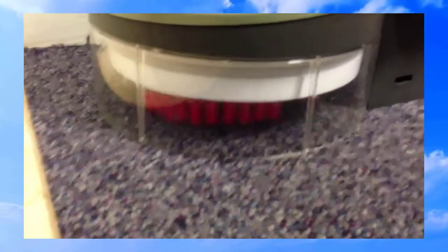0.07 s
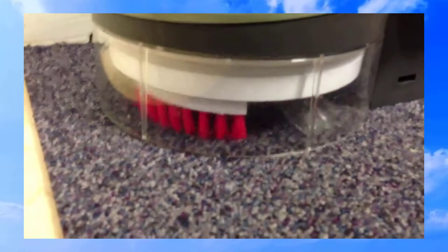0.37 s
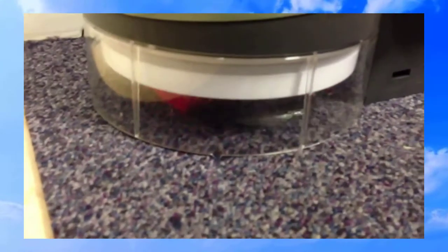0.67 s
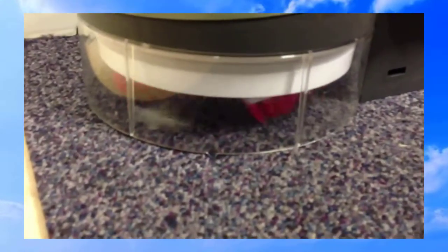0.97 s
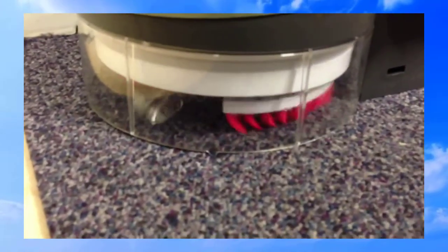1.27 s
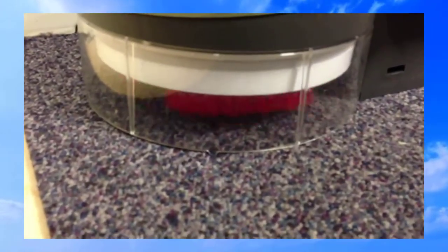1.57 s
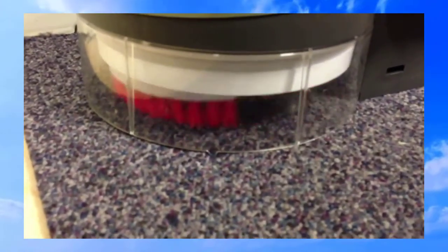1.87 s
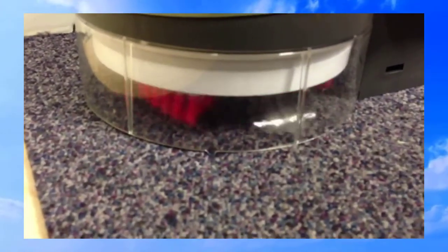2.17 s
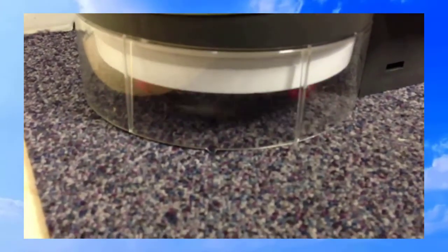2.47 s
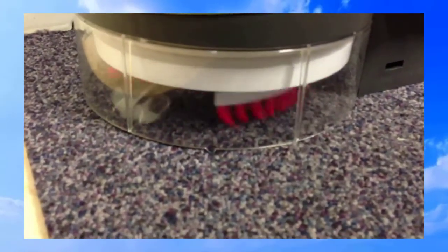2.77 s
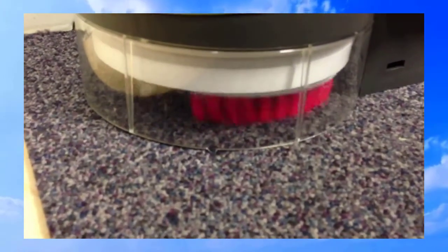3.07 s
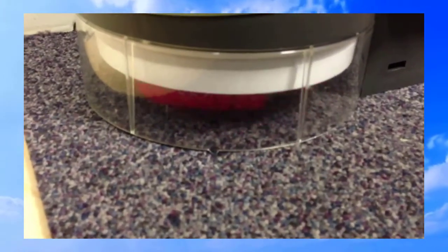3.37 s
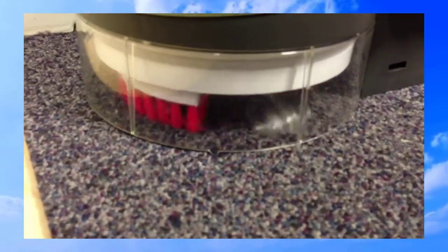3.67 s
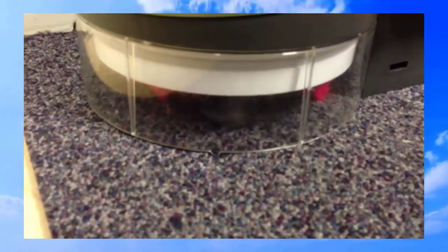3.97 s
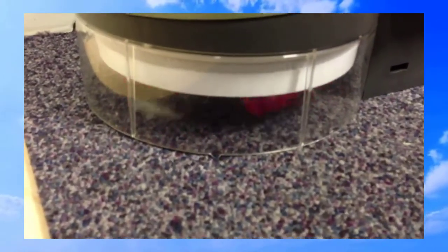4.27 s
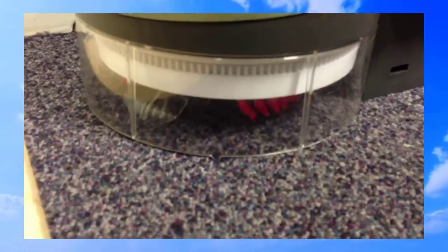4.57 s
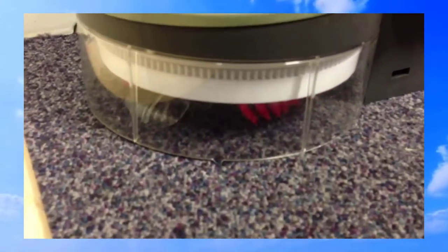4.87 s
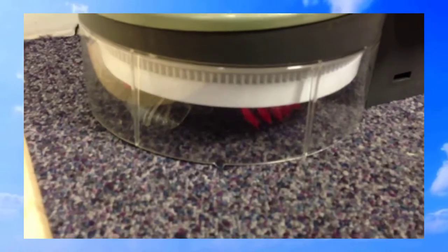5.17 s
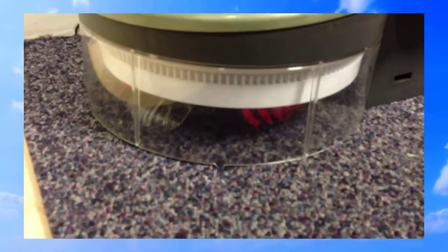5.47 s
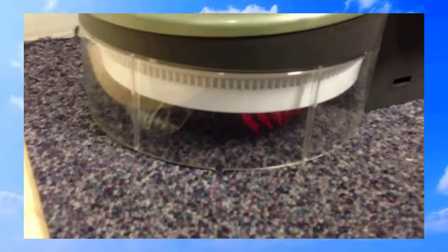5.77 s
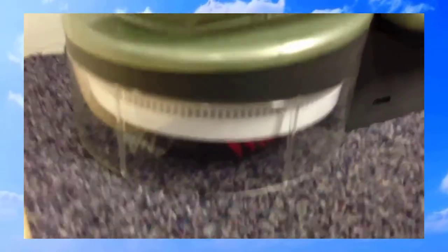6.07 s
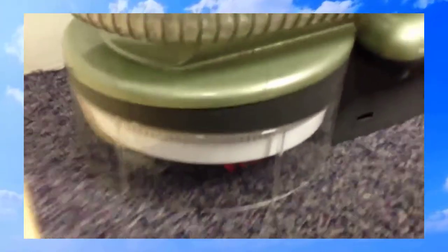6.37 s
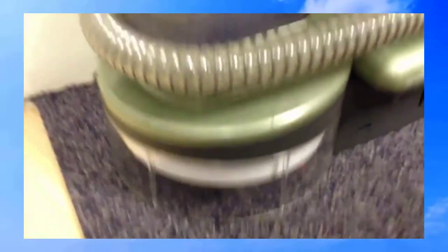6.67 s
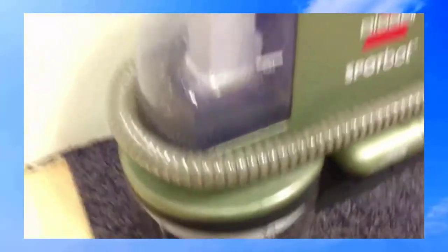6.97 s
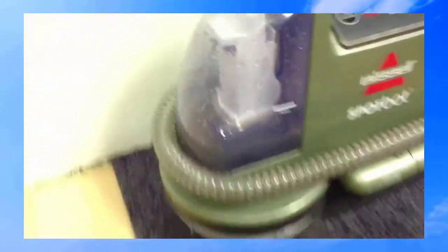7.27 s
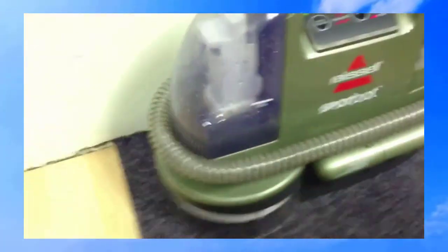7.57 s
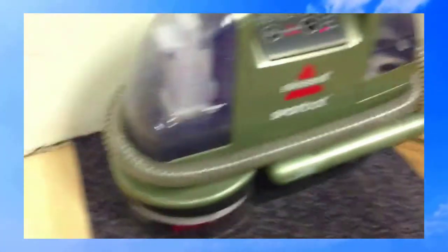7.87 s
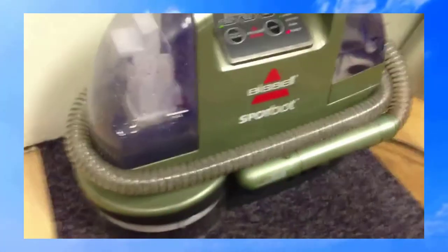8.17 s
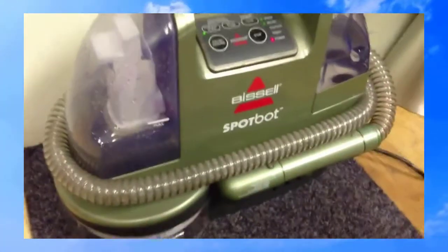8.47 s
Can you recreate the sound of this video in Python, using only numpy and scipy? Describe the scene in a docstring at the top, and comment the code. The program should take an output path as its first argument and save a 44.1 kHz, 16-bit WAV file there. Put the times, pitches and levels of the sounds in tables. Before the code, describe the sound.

A portable carpet cleaner runs close by in a small room, its motor giving a steady hum and high whine over rushing air. The whine swells and dips as the brush head circles, with faint scrubbing and a few light plastic knocks. The brushes rest about halfway through. Then the machine switches off, its tones gliding down while the rush fades to a soft whirr and hiss.

```python
"""A small room, with a portable carpet cleaner running on the floor. Its suction motor sings in tones locked
to one shaft, over the rush of air in the housing; the brush head circles and scrubs, then rests, and
plastic knocks now and then. The cleaner is switched off: the tones glide down as the rotor coasts,
ringing the shell on their way, and the rush fades to a hiss over the low rumble of the room."""
import sys
import numpy as np
from scipy import signal
from scipy.fft import rfft, irfft, next_fast_len
from scipy.io import wavfile

SR = 44100
rng = np.random.default_rng(int(sys.argv[2]) if len(sys.argv) > 2 else 0)


def generate_wav(signal):
    """Clip the signal to [-1, 1] and save it as 16-bit WAV at the path in sys.argv[1]."""
    frames = np.transpose(np.atleast_2d(signal))
    scaled = np.clip(frames, -1, 1) * 32767
    pcm = np.round(scaled).astype(np.int16)
    wavfile.write(sys.argv[1], SR, pcm)


N = 384097
TIME = np.arange(N) / SR
BRUSH_STOP_S, SWITCH_OFF_S = 4.5, 6.46

# rotor speed under power: time_s, speed_hz
ROTOR_SPEED = [(0, 458.4), (1.3, 458.2), (2.7, 459.3), (4.05, 458.8), (5.3, 457.9), (6.46, 458.2)]
FULL_SPEED_HZ = ROTOR_SPEED[-1][1]


def from_db(db):
    """Decibels to gain."""
    return np.exp(np.log(10) / 20 * np.asarray(db))


def rms_one(x):
    """Scale to unit power."""
    return x / np.sqrt(np.mean(x ** 2) + 1e-20)


def curve(points):
    """An automation curve: straight lines between timed points."""
    return np.interp(TIME, *np.transpose(points))


def bumps(rows, at):
    """Decibels added by short smooth swells and dips."""
    return sum(db * np.exp(-((at - s) / half_length) ** 2) for s, half_length, db in rows)


def lift(resonances, hz):
    """Decibels that a set of peaks and dips adds at a frequency."""
    return sum(db / (1 + (2 * (hz - centre) / width) ** 2) for centre, width, db in resonances)


def drift(rate_hz):
    """A smooth random wobble of unit power."""
    r = np.exp(-40 * np.pi * rate_hz / SR)
    slow = signal.lfilter([1], [1, -2 * r, r * r], rng.standard_normal(N // 20 + 2002))[2000:]
    return np.interp(np.arange(N) / 20, np.arange(len(slow)), rms_one(slow))


def noise(spectrum, resonances=(), ripple_db=0):
    """Coloured noise of unit power, shaped by resonances and rippled by wall reflections."""
    size = next_fast_len(N)
    hz = np.maximum(np.fft.rfftfreq(size, 1 / SR), 1)
    points_hz, points_db = np.transpose(spectrum)
    colour_db = np.interp(np.log(hz), np.log(points_hz), points_db) + lift(resonances, hz)
    ripple_hz = np.arange(0, SR / 2, 20)
    colour_db += ripple_db * np.interp(hz, ripple_hz, rng.standard_normal(len(ripple_hz)))
    return rms_one(irfft(rfft(rng.standard_normal(size)) * from_db(colour_db), size)[:N])


def tone(phase, rough, flutter_hz):
    """A sine of unit power whose level and phase are shaken by turbulence."""
    shaken = (1 + rough * drift(flutter_hz)) * np.sin(phase)
    return rms_one(shaken + rough * drift(flutter_hz) * np.cos(phase))


def room_tone():
    """The bed: a low room rumble and a faint hiss that lingers around the machine."""
    # colours of the rumble and the hiss: freq_hz, level_db
    rumble = [(20, -67), (50, -57), (80, -45), (105, -20), (130, -14), (155, -1.5), (178, -8), (210, 7.5),
              (255, -3.5), (320, -9), (400, -11), (620, -6.5), (900, -8), (4000, -37)]
    hiss = [(60, -64), (180, -40), (310, -2), (440, -17), (620, -6.5), (720, -16), (900, -10.5),
            (1100, -12), (1600, -5.5), (1950, -11), (2500, -9.5), (3000, -16.5), (3900, -21), (4800, -19),
            (7900, -24), (8700, -25.5), (10100, -31), (15000, -41)]
    return from_db(-37) * noise(rumble) + from_db(-39.5) * noise(hiss, ripple_db=2)


def brush_turning():
    """One while the brush head circles, zero once it rests."""
    return np.clip((BRUSH_STOP_S - TIME) / 0.099, 0, 1)


def brush_swing(turn_s=1.635):
    """Level swing in dB as nozzles and brushes uncover and hide the air inlet, alike on every turn."""
    # passes over the inlet within one turn: centre_s, half_length_s, gain_db
    passes = [(.02, 0.034, 2), (0.29, 0.053, 3), (0.476, 0.12, 1.5), (0.773, 0.054, -5), (1.267, 0.21, 4),
              (1.415, 0.036, -8)]
    into_turn = np.linspace(0, turn_s, 400)
    return brush_turning() * np.interp(TIME % turn_s, into_turn, bumps(passes, into_turn))


def scrubbing():
    """Bristles dragged over the carpet shake the housing until the brush head rests."""
    # colour of the shaking: freq_hz, level_db
    colour = [(30, -45), (85, -45), (140, -2.5), (220, 9.5), (330, -3), (600, 1.5), (1500, -54)]
    return brush_turning() * from_db(-37.5 + 2 * drift(13)) * noise(colour)


def nozzles(speed_share):
    """Air whistles past the nozzles, a breathy band that swells and sinks as they circle."""
    # colour of the breath: freq_hz, level_db
    colour = [(1000, -39), (2550, -32), (2700, -3.5), (2800, 4), (2900, -9), (3030, -16), (3300, -2),
              (3450, 3), (3700, -28), (4000, -15), (4400, -20), (9000, -45)]
    return from_db(-34.8 + 1.2 * brush_swing()) * speed_share ** 5 * noise(colour)


def knocks(contact_s=0.0018):
    """A short plastic clatter swells to a soft blow, which rings the low modes of the housing."""
    # knocks of the brush head and housing: start_s, thump_db, clatter_db, length_s
    hits = [(0.449, -12, -37, 0.0105), (0.594, -16, -19.5, 0.0196), (2.275, -11, -22.5, 0.02),
            (3.945, -24, -20.5, 0.04), (6.483, -23, -28, 0.0177), (7.7, -19, -51, 0.0084)]
    # colour of the plastic clatter: freq_hz, level_db
    colour = [(80, -20), (170, -3), (300, -2), (700, -2), (1050, 2.5), (1600, -1), (2500, -20), (6000, -53),
              (15000, -60)]
    # low modes of the housing: pitch_hz, level_db, t60_s
    modes = [(150, -7, 0.059), (210, -4, 0.089), (260, -4, 0.064), (335, 1.5, 0.036), (590, -12, 0.032)]
    clatter, out, pushes = noise(colour), np.zeros(N), np.full(N, 1e-18)
    for start_s, thump_db, clatter_db, length_s in hits:
        age = np.clip((TIME - start_s) / length_s * 2, 0, 20)
        out += age * np.exp(1 - age) * from_db(clatter_db) * clatter
        push = np.exp(-((TIME - start_s - length_s / 2) / contact_s * 2) ** 2)
        pushes += from_db(thump_db) * push / push.sum()
    for k, (hz, db, t60_s) in enumerate(modes):
        r, w = np.exp(-np.log(1000) / (t60_s * SR)), 2 * np.pi * hz / SR
        ring = signal.lfilter([0, np.sin(w)], [1, -2 * r * np.cos(w), r * r], pushes)
        out += (-1) ** k * from_db(db) * ring
    # the knocks carry no deep bass
    return signal.sosfilt(signal.butter(2, 116, "high", fs=SR, output="sos"), out)


def side_tones():
    """Faint wavering tones sound until the power is cut."""
    # steady pitches of the running machine: pitch_hz, level_db
    pitches = [(559, -50), (2092, -51), (2371, -46)]
    running = np.exp(-np.maximum(TIME - SWITCH_OFF_S, 0) / 0.048)
    return running * sum(from_db(db) * tone(2 * np.pi * hz * TIME, rough=0.47, flutter_hz=3.7)
                         for hz, db in pitches)


def shell_rings(speed_hz, speed_share):
    """The slowing rotor shakes the shell, which flares as an overtone glides through a resonance."""
    # hollow rings of the shell: pitch_hz, width_hz, level_db, fade_exponent
    rings = [(621, 18, -29, 1.3), (1216, 55, -37, 5.4), (1440, 110, -20, 5.9), (2050, 70, -38, 2.4),
             (2960, 68, -34, 2.9), (3970, 86, -37, 3.6), (5620, 120, -41, 2.5), (6980, 140, -49, 2.2)]
    out, speeds = np.zeros(N), np.arange(speed_hz.max())
    for hz, width_hz, db, fade in rings:
        r = np.exp(-np.pi * width_hz / SR)
        poles = [1, -2 * r * np.cos(2 * np.pi * hz / SR), r * r]
        ring = rms_one(signal.lfilter([1, 0, -1], poles, rng.standard_normal(N)))
        meeting = sum(1 / (1 + ((k * speeds - hz) / width_hz) ** 4) for k in range(2, 25))
        out += from_db(db) * speed_share ** fade * np.interp(speed_hz, speeds, meeting) * ring
    return out * (1 - speed_share ** 10)


def suction_duct(speed_share):
    """The duct adds a hollow band to the rush, which surges now and then."""
    # colour of the band: freq_hz, level_db
    colour = [(700, -45), (1050, -12), (1220, 0), (1320, -8), (1480, 4), (1600, 2), (1750, -16),
              (2600, -32)]
    # its surges: centre_s, half_length_s, gain_db
    surges = [(1.34, .09, 9), (1.53, 0.055, 10), (2.0, .2, 3), (3.0, 0.045, 10), (5.15, .2, 2),
              (6.03, 0.095, 9.5)]
    return from_db(-36.5 + bumps(surges, TIME)) * speed_share ** 6 * noise(colour)


def airflow(angle, speed_share, mains_hz=50):
    """Turbulence rings in the housing and hisses at the vents; as suction dies, a whirr takes over."""
    # colours of the fan's rush, the freewheeling whirr and the vent hiss: freq_hz, level_db
    rush_colour = [(50, -62), (120, -16), (200, -5), (320, -1), (400, -12.5), (600, -5), (850, -0.5),
                   (1400, 0.5), (1800, -3), (3400, -1.5), (5300, -7.5), (6200, -14), (8000, -25.5),
                   (15000, -38)]
    whirr_colour = [(40, -50), (90, -29), (190, 0), (300, -1), (450, -4.5), (850, -1), (1100, -0.5),
                    (1600, -2.5), (1850, -9.5), (2700, -2.5), (3700, -10.5), (4500, -11), (5200, -20),
                    (8000, -24.5), (15000, -50)]
    hiss_colour = [(60, -47), (600, -23), (2000, 15.5), (3200, 0.5), (4500, 7.5), (6500, 3), (8500, -4.5),
                   (10000, -5.5), (12500, -8), (15000, -16)]
    # peaks and notches of the housing's air, the shell and the vents: centre_hz, width_hz, gain_db
    housing = [(790, 60, 2), (880, 70, 2.5), (930, 50, -3.5), (1164, 110, 4.5), (1445, 90, 3.5),
               (1570, 90, 2.5), (1810, 70, 2), (1890, 70, -2.5), (2044, 130, 2.5), (2240, 200, 2),
               (2490, 92, -2), (2780, 150, 3.5), (2970, 90, -3), (3200, 69, -1), (3460, 210, 4),
               (4005, 130, 5), (4390, 140, 2.5), (4600, 80, -2.5), (5070, 270, 5), (5380, 140, -2.5),
               (6340, 130, -17), (6620, 150, 3), (7500, 130, 7), (7520, 130, -6), (7920, 160, 8),
               (8150, 220, 8)]
    shell = [(466, 110, 0), (598, 45, 5), (704, 50, -6), (806, 63, 5), (1170, 55, 3), (1320, 60, 0),
             (1440, 130, 4), (1790, 150, -9), (2080, 100, 1), (2920, 94, 1.5), (3060, 70, 0),
             (3210, 90, 3.5), (3380, 100, 4), (3980, 150, 7), (4300, 200, -3), (5580, 170, 7),
             (6960, 150, 5), (7400, 220, 3)]
    vents = [(6230, 200, -3), (7500, 150, -3), (8800, 200, 2), (9450, 200, -1.5), (9950, 200, 2.5),
             (10350, 250, -2.5), (10580, 140, 2), (11200, 220, -2), (12260, 220, 2), (14220, 190, 3.5)]
    suction = speed_share ** 7
    rush = np.sqrt(suction) * noise(rush_colour, housing, ripple_db=1.7)
    whirr = np.sqrt(1 - suction) * noise(whirr_colour, shell, ripple_db=4)
    hiss = from_db(-31 + drift(25)) * speed_share ** 2.57 * noise(hiss_colour, vents, ripple_db=0.9)
    flow_gain = from_db(-21.5 + 0.4 * drift(15)) * speed_share ** 2.64
    # the shaft chops the flow slightly, and each half wave of the mains pulses it
    chop = 0.019 * np.sin(angle) + 0.03 * np.sin(2 * angle)
    pulse = 0.049 * suction * np.sin(4 * np.pi * mains_hz * TIME)
    return (flow_gain * (rush + whirr) + hiss) * (1 + chop + pulse)


def glide_gain(speed_share, path, order, fade):
    """A rotor tone fades with speed, flaring in the resonances of its path and sinking in the nulls."""
    shares = np.linspace(0, 1, 2000)
    path_db = lift(path, order * FULL_SPEED_HZ * shares)
    return np.interp(speed_share, shares, shares ** fade * from_db(path_db - path_db[-1]))


def overtones(angle, speed_share):
    """Faint harmonics of the rotor, which die early as it slows."""
    # high harmonics: shaft_multiple, level_db
    harmonics = [(13, -57), (16, -63), (21, -68), (24, -70), (28, -72)]
    # third harmonic, stronger once the brush head rests: time_s, level_db
    third_level = [(0, -34.5), (4.4, -34.5), (4.6, -31), (6.25, -30), (6.5, -34)]
    shimmer = np.sqrt(2) * (1 + 0.2 * drift(6.6))
    high = shimmer * sum(from_db(db) * np.sin(k * angle) for k, db in harmonics)
    third = from_db(curve(third_level)) * tone(3 * angle, rough=0.2, flutter_hz=12)
    return high * speed_share ** 6 + third * speed_share ** 15


def slot_whistle(angle, speed_share, slots=12, draw_back_s=0.4):
    """The rotor's slots whistle; gliding down, the tone beats against its late echoes from the walls."""
    # the whistle sags once, later swells and drops out as the listener moves: time_s, level_db
    level = [(0, -33), (2.1, -31), (2.65, -36), (3.2, -32.5), (5.85, -31), (6.15, -26.5), (6.35, -43),
             (6.5, -37.5), (8.7, -41.5)]
    # resonances and echo nulls on its way out: centre_hz, width_hz, gain_db
    path = [(2190, 150, 15.5), (2265, 35, -10), (2400, 100, 9), (2530, 50, -9), (2690, 80, -4),
            (2880, 63, 7), (3050, 49, -13), (3240, 330, 5.5), (3580, 120, 2), (3680, 90, -16),
            (3990, 200, 8), (4550, 160, 10.5), (4900, 90, -14), (5170, 130, -17), (5405, 100, 10)]
    # wall echoes, heard once the listener draws back: delay_s, level_db
    walls = [(.011, -10), (.019, -7), (.03, -23)]
    gain = from_db(curve(level)) * glide_gain(speed_share, path, order=slots, fade=1)
    singing = np.clip((speed_share - 0.355) / 0.035, 0, 1)  # sinks into the whirr near a third of speed
    whistle = singing * gain * tone(slots * angle, rough=0.095, flutter_hz=12)
    echoes = sum(from_db(db) * np.interp(TIME - delay_s, TIME, whistle) for delay_s, db in walls)
    away = np.clip((TIME - SWITCH_OFF_S) / draw_back_s, 0, 1)
    return whistle + away * echoes


def blade_whine(angle, speed_share, near_db, blades=7):
    """The fan whines at its blade rate, swinging with the brush head, and again an octave above."""
    # brief flares and dips of the whine: centre_s, half_length_s, gain_db
    flares = [(0.12, 0.029, -3.5), (0.3, 0.028, 4), (0.36, 0.018, -7), (0.55, .03, 1.5), (0.8, .09, 4),
              (1.94, 0.056, 2), (2.13, 0.026, 4), (2.45, .03, -4), (2.72, .02, -4), (3.26, 0.035, 5.5),
              (3.58, 0.027, -0.5), (3.7, 0.074, 1.5), (4.3, .04, -5)]
    # the octave, restless while the brush head circles: time_s, level_db
    octave_level = [(0.03, -49), (0.2, -33), (0.42, -46), (0.55, -42), (0.66, -44), (0.86, -36), (1.0, -42),
                    (1.1, -38.5), (1.22, -35), (1.3, -45), (1.5, -47), (1.6, -38), (1.7, -46), (1.95, -49),
                    (2.03, -35.5), (2.25, -54), (2.55, -38), (2.66, -48), (2.76, -38), (2.95, -32.5),
                    (3.06, -46), (3.17, -37), (3.56, -51), (3.7, -39), (3.95, -50), (4.1, -45), (4.5, -39),
                    (5.9, -40), (6.45, -38.5)]
    # resonances and echo nulls on each tone's way out: centre_hz, width_hz, gain_db
    whine_path = [(950, 120, 3), (1260, 150, 7), (1500, 110, 7), (1760, 280, -11), (2050, 45, 9),
                  (2110, 55, -13), (2200, 45, 7), (2250, 60, -6), (2590, 69, 9.5), (2664, 34, -39),
                  (2944, 498, 16.5), (3010, 46, -28)]
    octave_path = [(2910, 170, 13), (3430, 240, 10), (4000, 140, 3), (4620, 160, 6), (5500, 1000, -17)]
    whine_db = -23 + brush_swing() + bumps(flares, TIME)
    whine = from_db(whine_db) * tone(blades * angle, rough=0.16, flutter_hz=33)
    whine *= glide_gain(speed_share, whine_path, order=blades, fade=1.4)
    octave = from_db(curve(octave_level)) * tone(2 * blades * angle, rough=0.17, flutter_hz=22)
    octave *= glide_gain(speed_share, octave_path, order=2 * blades, fade=3.3)
    return from_db(near_db) * (whine + octave)


def rotor_hum(angle, speed_share, near_db):
    """The rotor hums at its shaft rate and breaks into uneven pulses as it nears rest."""
    # base level of the hum: time_s, level_db
    level = [(0.03, -15.5), (0.9, -14.5), (2.15, -14.5), (2.32, -16), (2.5, -14), (3.2, -14.5),
             (3.27, -13.5), (3.45, -15), (4.12, -14.5), (4.28, -14), (4.48, -14.5), (5.9, -14),
             (6.45, -14.5)]
    # resonances and echo nulls on its way out: centre_hz, width_hz, gain_db
    path = [(203, 45, 10.5), (298, 24, 5.5), (391, 24, -18)]
    flutter_db = 7 * (1 - speed_share) ** 2 * drift(26)
    hum = from_db(curve(level) + 0.12 * near_db + flutter_db) * tone(angle, rough=0.049, flutter_hz=35)
    return hum * glide_gain(speed_share, path, order=1, fade=3.88)


def motor(angle, speed_share):
    """Hum, whine, whistle and overtones, all locked to the one shaft."""
    # the listener rises past the motor and draws back: time_s, gain_db
    nearness = [(5.9, -4), (6.25, -0.5), (6.45, -0.5), (6.7, -6), (8.7, -10)]
    near_db = curve(nearness)
    lead = rotor_hum(angle, speed_share, near_db) + blade_whine(angle, speed_share, near_db)
    return lead + slot_whistle(angle, speed_share) + overtones(angle, speed_share)


def coasting(friction_hz_per_s=69, full_drag_hz_per_s=217):
    """Share of full speed: after switch-off, bearing friction and square-law air drag slow the rotor."""
    ratio = np.sqrt(full_drag_hz_per_s / friction_hz_per_s)
    slowed = ratio * friction_hz_per_s / FULL_SPEED_HZ * np.maximum(TIME - SWITCH_OFF_S, 0)
    return np.clip(np.tan(np.arctan(ratio) - slowed) / ratio, 0, 1)


def scene():
    """One shaft speed drives the tones and the air; the machine stands close by, over the room tone."""
    speed_share = coasting()
    speed_hz = curve(ROTOR_SPEED) * speed_share
    angle = 2 * np.pi * np.cumsum(speed_hz) / SR
    suction_unit = motor(angle, speed_share) + airflow(angle, speed_share) + suction_duct(speed_share)
    suction_unit += side_tones() + shell_rings(speed_hz, speed_share)
    brush_head = nozzles(speed_share) + scrubbing() + knocks()
    return (suction_unit + brush_head + room_tone())[None]


def record(dry):
    """A steep low-pass cuts the top above 15250 Hz."""
    return signal.sosfilt(signal.ellip(12, 0.1, 80, 15250, fs=SR, output="sos"), dry)


dry = scene()
out = record(dry)
generate_wav(out)
```